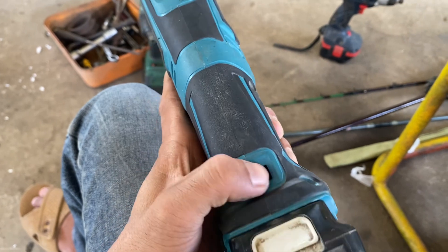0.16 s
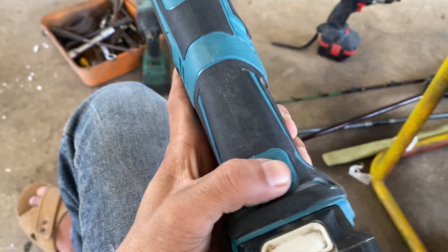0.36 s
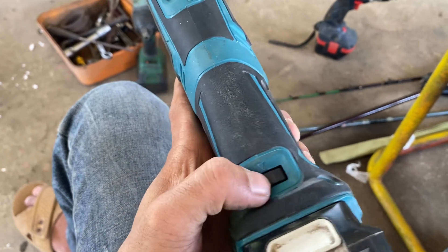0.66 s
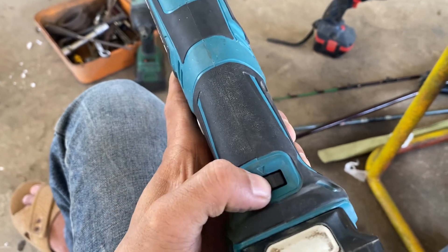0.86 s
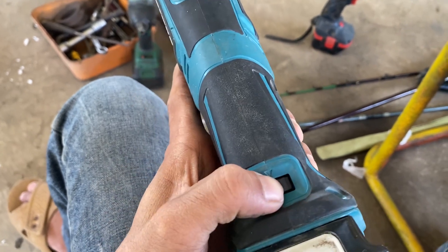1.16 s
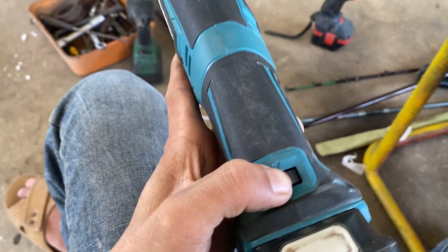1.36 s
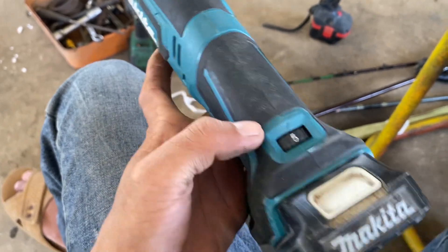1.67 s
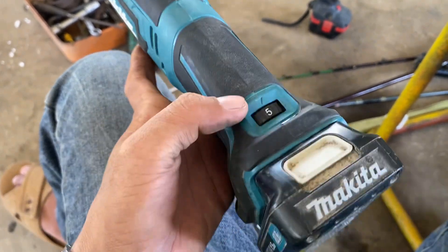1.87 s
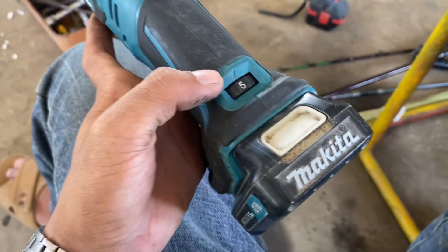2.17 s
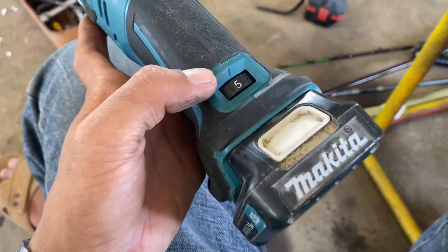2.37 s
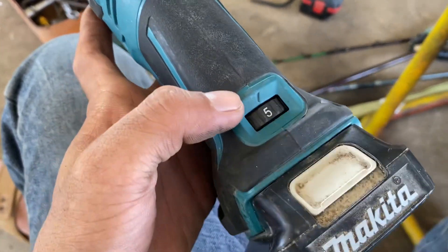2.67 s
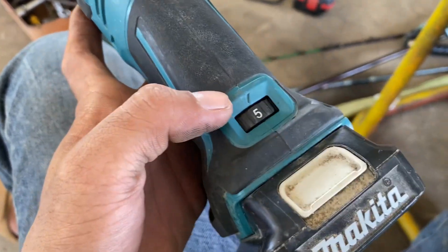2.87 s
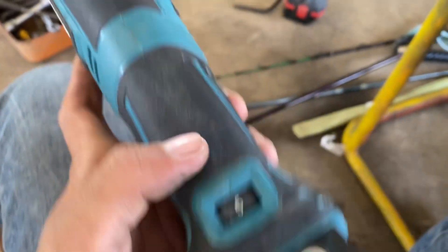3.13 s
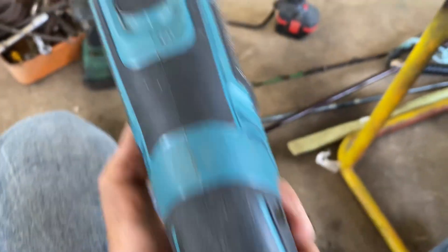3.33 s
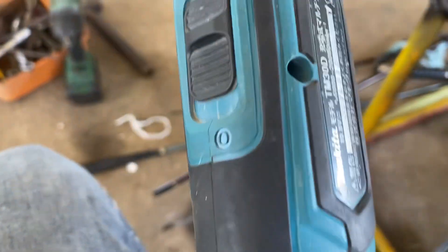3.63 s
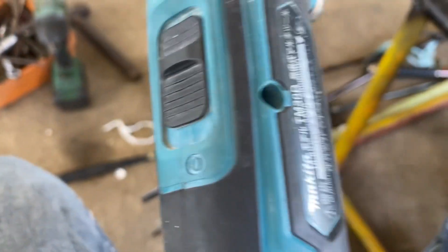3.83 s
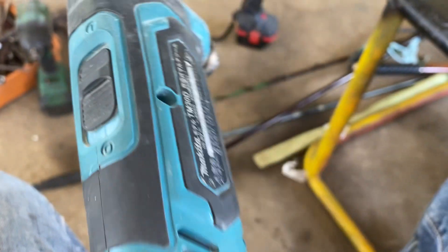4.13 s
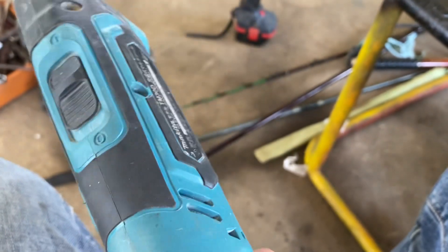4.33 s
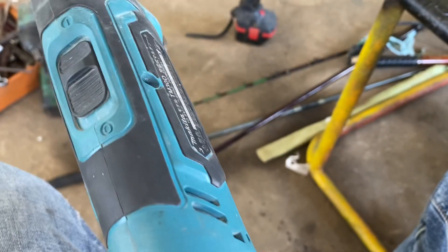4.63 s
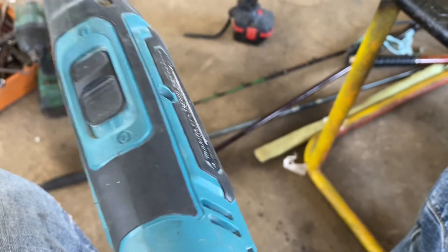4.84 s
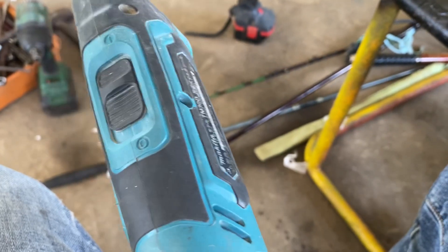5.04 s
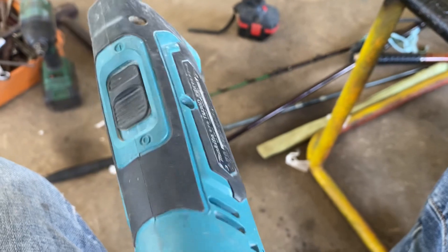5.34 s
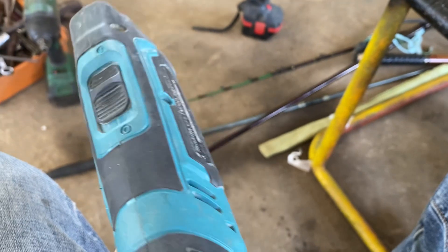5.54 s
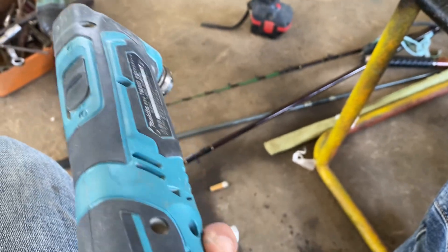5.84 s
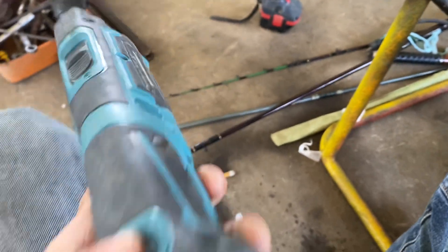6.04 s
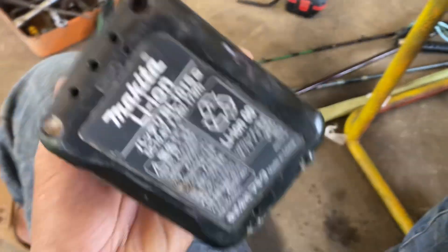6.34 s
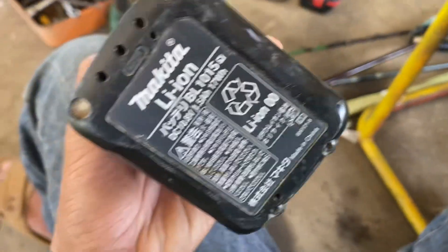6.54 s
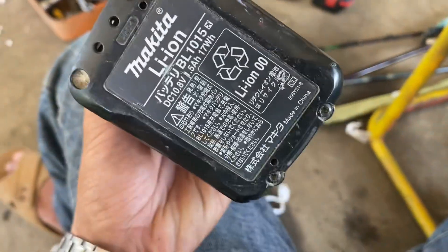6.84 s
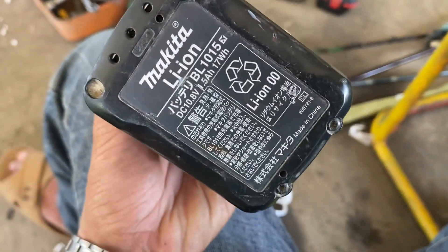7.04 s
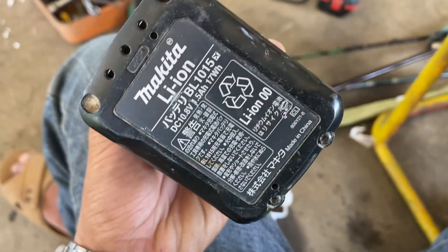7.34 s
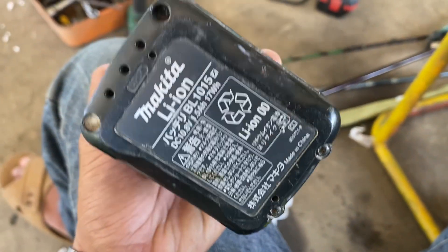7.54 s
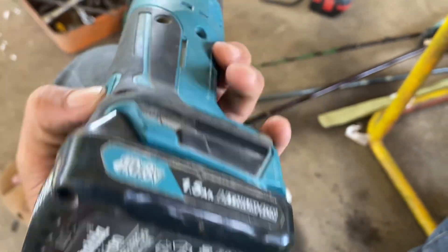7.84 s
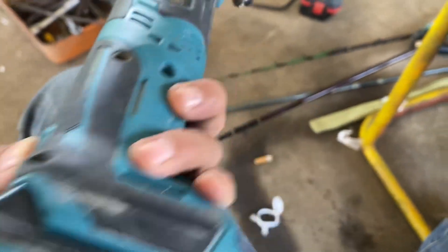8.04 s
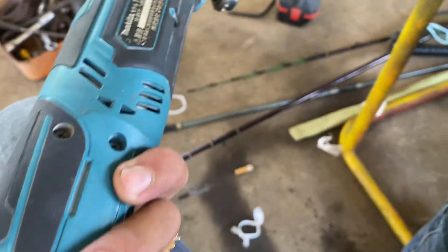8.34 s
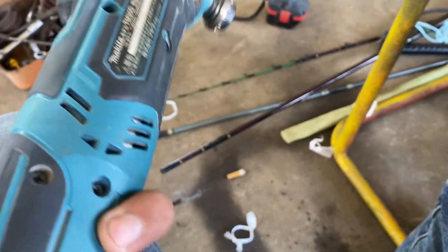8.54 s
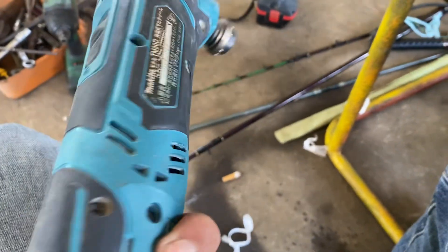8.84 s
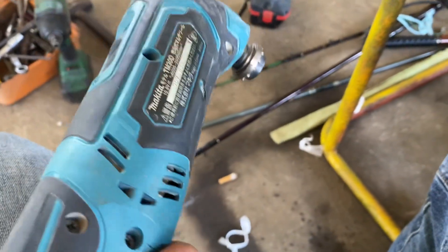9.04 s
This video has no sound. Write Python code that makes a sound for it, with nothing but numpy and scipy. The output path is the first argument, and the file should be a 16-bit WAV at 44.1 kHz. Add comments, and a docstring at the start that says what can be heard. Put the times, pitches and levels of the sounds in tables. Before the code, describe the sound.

Buzzing whine of a cordless oscillating tool rises, holds, winds down to clattering, then speeds up; midway a single-cylinder engine starts thumping.

```python
"""Multi-tool running free in a workshop

A cordless oscillating multi-tool runs in the hand, close to the microphone, over a low rumble from outside.
Its speed dial is turned up, down to a slow rattle and up again. Tones tied to the shaft speed make the whine;
noise shaped by the housing makes the fan's hiss and the drive's knocks, two per turn of the shaft.
Midway a single-cylinder engine nearby catches, idles and picks up: one low pressure swing and ringing per firing.
A few things are bumped: short bands of noise that die away."""
import sys
import numpy as np
from scipy import signal
from scipy.fft import rfft, irfft
from scipy.io import wavfile

SR = 44100
rng = np.random.default_rng(int(sys.argv[2]) if len(sys.argv) > 2 else 0)


def waveform_to_disk(signal):
    """Save audio, clipped to [-1, 1], as 16-bit WAV at the path in sys.argv[1]."""
    frames = np.transpose(np.atleast_2d(signal))
    scaled = np.clip(frames, -1, 1) * 32767
    samples = np.round(scaled).astype(np.int16)
    wavfile.write(sys.argv[1], SR, samples)


N = 405719
TIME = np.arange(N) / SR
FREQ = np.maximum(np.arange(N // 2 + 1) * SR / N, 1)
LEFT_RIGHT = np.array([[1], [-1]])  # opposite signs for the two channels


def undb(db):
    """Turn decibels into a gain."""
    return 10 ** (np.asarray(db) / 20)


def unit(x):
    """Scale a sound to an rms of 1."""
    return x / np.sqrt(np.mean(x ** 2))


def curves(table):
    """Read each column of a timed table, sample by sample."""
    s, *columns = np.transpose(table)
    return [np.interp(TIME, s, column) for column in columns]


def over_hz(table):
    """Spread a (pitch, value) table over all frequencies."""
    hz, value = np.transpose(table)
    return np.interp(np.log(FREQ), np.log(hz), value)


def shape(x, gain):
    """Filter a sound with one gain per frequency."""
    return irfft(rfft(x) * gain, N)


def walk(rate):
    """Drift in straight lines between random points, `rate` points a second, with a spread near 1."""
    points = rng.standard_normal(int(N / SR * rate) + 2)
    return 1.2 * np.interp(TIME * rate, np.arange(len(points)), points)


def window(start, end, edge_s):
    """Give 1 between two times and 0 outside, with sloping edges."""
    return np.clip(np.minimum(TIME - start, end - TIME) / edge_s + .5, 0, 1)


def fade(t, t60):
    """Die away by 60 dB in t60 seconds."""
    return np.exp(-np.log(1000) * t / t60)


def add(out, s, sound):
    """Mix a sound in at time s."""
    start = int(s * SR)
    out[..., start:start + sound.shape[-1]] += sound[..., :N - start]


def burst(hz, t60, spread):
    """Make a dying band of noise around hz in two channels, mostly alike."""
    t = TIME[:SR // 2]
    edges = np.sort(np.clip([hz / spread, hz * spread], 20, .45 * SR))
    band = signal.butter(2, edges, "band", fs=SR, output="sos")
    mid, side = signal.sosfilt(band, rng.standard_normal((2, len(t))))
    return unit(mid + 0.52 * side * LEFT_RIGHT) * fade(t, t60)


# colour of the workshop background: pitch_hz, relative level_db
BACKGROUND_COLOUR = [(25, -30), (45, -1.5), (65, -0.5), (100, 0), (150, 2), (220, -12), (500, -28),
                     (1500, -18), (6000, -47)]


def workshop(level_db=-50, width=0.097):
    """A low rumble from outside is noise with a fixed colour, nearly the same in both channels."""
    mid, side = shape(rng.standard_normal((2, N)), undb(over_hz(BACKGROUND_COLOUR)))
    return unit(mid + width * side * LEFT_RIGHT) * undb(level_db + walk(4.44))


# dull bumps: start_s, level_db, pitch_hz, t60_s (time to die by 60 dB)
BUMPS = [(2.01, -30, 250, 0.16), (2.798, -33, 194, .12), (3.576, -40, 200.3, 0.12),
         (5.553, -35, 328, 0.067), (8.525, -28, 333.2, 0.14)]
# small plastic ticks and a light metal clink: start_s, level_db, pitch_hz, t60_s, band_edge_over_centre (ratio)
TICKS = [(6.358, -29.5, 2330, .04, 1.15), (6.758, -36, 2400, .04, 1.2), (6.885, -43, 6500, .04, 2),
         (6.89, -46, 5500, 0.24, 1.7), (6.893, -46, 5900, 0.48, 1.025), (7.392, -33, 2400, .04, 1.16),
         (7.419, -34, 2400, .04, 1.12), (7.612, -32.5, 2500, 0.045, 1.4)]
# a hollow object knocked twice: start_s, level_db
KNOCKS = [(7.113, -37), (7.163, -33)]
# how that object rings: pitch_hz, level_db on top of the knock's, t60_s, band_edge_over_centre (ratio)
KNOCK_MODES = [(330, 1, .3, 1.36), (552, 1, 0.28, 1.01), (1070, 2, 0.3, 1.29), (1550, -6, 0.41, 1.14),
               (2200, -3, 0.34, 1.09), (6600, -13, .05, 1.15)]


def handling():
    """Bumps, ticks and a hollow double knock are short bands of noise that die away."""
    out = np.zeros((2, N))
    for s, db, hz, t60 in BUMPS:
        add(out, s, undb(db) * burst(hz, t60, spread=1.28))
    for s, db, hz, t60, spread in TICKS:
        add(out, s, undb(db) * burst(hz, t60, spread))
    for s, db in KNOCKS:
        knock = sum(undb(db + mode_db) * burst(hz, t60, spread) for hz, mode_db, t60, spread in KNOCK_MODES)
        add(out, s, knock)
    return out


# the engine's first uneven firings as it catches: start_s, relative level_db
CATCHES = [(5.595, -29), (5.826, -22), (5.907, -22.5), (5.98, -27.5), (6.047, -24.5)]
# then it idles and picks up: time_s, firing_rate_hz
ENGINE_RATE = [(6.217, 11.0), (6.57, 14.26), (6.61, 13.05), (7.1, 12.745), (7.615, 13.37), (7.77, 12.83),
               (8.613, 12.335), (8.835, 18.19), (9.2, 19.3)]


def firings(idle_hz=13, idle_db=-22.5, rise_db_per_s=1.1, rise_db_per_octave=5.5, scatter_db=1.3):
    """List the firings: after the catch one per cycle, growing stronger with time and with speed."""
    rate, = curves(ENGINE_RATE)
    start = ENGINE_RATE[0][0]
    cycles = np.cumsum(rate * (TIME >= start)) / SR
    at = np.flatnonzero(np.diff(np.ceil(cycles)))
    db = idle_db + rise_db_per_s * (TIME[at] - start) + rise_db_per_octave * np.log2(rate[at] / idle_hz)
    return CATCHES + list(zip(TIME[at], db + scatter_db * rng.standard_normal(len(at))))


# exhaust and wall resonances: pitch_hz, relative level_db, t60_s
EXHAUST = [(64.1, -12.5, 0.32), (129.7, -9, 0.44), (151.5, -20.5, 0.6), (187.3, -22.5, 0.58),
           (219, -15, 0.13), (268.1, -13, 0.31), (318.5, -24.5, 0.68), (367, -24, 0.6), (412, -27.5, 0.68)]


def engine(attack_s=0.00085, level_db=-1, swell_s=0.01583, pulse_hz=100, pulse_s=0.02, pulse_db=-7,
           puff_db=-23, puff_hz=240, vary_db=2.5):
    """Each firing is one low pressure swing; exhaust and walls ring on after it, with a dull puff of gas."""
    out = np.zeros((2, N))
    t = TIME[:SR // 2] - swell_s
    pulse = undb(pulse_db) * np.sin(2 * np.pi * pulse_hz * t) * np.exp(-(t / pulse_s) ** 2)
    hz, mode_db, t60 = np.transpose(EXHAUST)[:, :, None]
    # the upper resonances start with the valve's opening, ahead of the low swing
    age = t + np.where(hz > 150, .011, 0)
    swell = np.exp(-(np.minimum(age, 0) * hz / 0.98) ** 2)
    rings = undb(mode_db) * np.sin(2 * np.pi * hz * age) * fade(np.maximum(age, 0), t60) * swell
    attack = np.minimum(TIME[:len(t)] / attack_s, 1)
    for s, db in firings():
        # a harder firing rings the upper resonances more
        bright_db = 0.36 * (db + 13) * np.log2(hz[:, 0] / 130)
        thump = pulse + undb(bright_db + vary_db * rng.standard_normal(len(rings))) @ rings
        puff = undb(puff_db) * burst(puff_hz, t60=1.0, spread=1.41)
        add(out, s, undb(db + level_db) * attack * (thump + puff))
    return out


def yard(x, alike_hz=95, level_db=-14, t60=0.073):
    """The engine's thumps come back off the walls, with opposite sign in the two channels."""
    walls = rng.standard_normal(SR // 2) * fade(TIME[:SR // 2], t60)
    echo = signal.fftconvolve(x.mean(axis=0), walls / np.sqrt(np.sum(walls ** 2)))[:N]
    # without deep bass in the echo, the deepest bass stays the same on both sides
    echo = shape(echo, 1 / (1 + (alike_hz / FREQ) ** 4))
    return x + undb(level_db) * echo * LEFT_RIGHT


def controller(switching_hz=8000, level_db=-62):
    """The speed control chops the motor current: a thin, steady tone, heard when the tool is quiet."""
    return np.sqrt(2) * undb(level_db + walk(8)) * np.sin(2 * np.pi * switching_hz * TIME)


# spells when the loose head clatters, at its slowest: start_s, end_s
CLATTER_SPAN = (6.3, 7.72)
# how the head rings with each knock: pitch_hz, relative level_db, t60_s
HEAD_MODES = [(820, -17.5, 0.039), (1470, -9, 0.03), (2256, -6, 0.032), (2370, -4.5, 0.026),
              (2980, -8.5, 0.016), (3940, -21, .008), (6600, -20, .006)]


def clatter(turns, peak_db=-37, scatter_db=4.0, back_db=-6, late_s=0.0014, detune=0.025, vary_db=4.5,
            swell_db=0.5):
    """The loose fork knocks at both ends of its swing; force, timing and ring differ each time."""
    out = np.zeros(N)
    t = TIME[:SR // 20]
    hz, mode_db, t60 = np.transpose(HEAD_MODES)[:, :, None]
    strength = window(*CLATTER_SPAN, 0.1) * undb(swell_db * walk(9))
    ends = np.flatnonzero(np.diff(np.floor(2 * turns)) * strength[1:])
    for k, at in enumerate(ends):
        force, late = rng.standard_normal(2)
        pitch, colour = rng.standard_normal((2, len(hz), 1))
        wave = np.sin(2 * np.pi * hz * (1 + detune * pitch) * t)
        ring = undb(mode_db + vary_db * colour) * wave * fade(t, t60)
        # every second knock, on the way back, is weaker
        knock_db = peak_db + scatter_db * min(force, 1) + back_db * (k % 2)
        add(out, TIME[at] + late_s * late, strength[at] * undb(knock_db) * ring.sum(axis=0))
    return out


# housing parts that buzz at certain speeds and grips: start_s, end_s, start_hz, end_hz, width_hz, relative level_db
BUZZES = [(0.35, 1.75, 1090, 1102, 440, -40.5), (0.2, 1.6, 2302, 2295, 600, -41),
          (0.401, 1.603, 3150, 3180, 900, -41), (3.191, 3.41, 2800, 2430, 330, -26.5),
          (3.097, 3.924, 950, 926, 220, -37.5), (3.42, 3.98, 4250, 4270, 900, -30.5),
          (4.196, 4.684, 2540, 2450, 260, -35), (4.196, 4.75, 3970, 3980, 380, -39),
          (4.75, 5.25, 3970, 3945, 380, -36.5), (5.294, 6.028, 3860, 3880, 380, -43.5),
          (5.353, 6.005, 2370, 2364, 352, -44), (5.917, 6.03, 2797, 2800, 2400, -37),
          (6.55, 7.7, 7300, 7400, 60, -67), (7.686, 8.248, 3800, 3960, 450, -44),
          (7.8, 8.5, 4600, 4730, 500, -48.5), (7.95, 8.201, 2500, 2903, 2400, -36.5),
          (8.396, 9.246, 4040, 3950, 400, -38.5), (8.858, 9.25, 6050, 6170, 300, -43)]


def buzzes(turns, edge_s=0.14, sharpness=1.45, flicker_db=1.5):
    """Narrow resonances are shaken unevenly once a turn; each fades in and out and slides as the grip shifts."""
    jolts = np.exp(sharpness * np.cos(2 * np.pi * turns)) * undb(flicker_db * walk(70))
    out = 0
    for start, end, start_hz, end_hz, width, db in BUZZES:
        # slow noise, moved up to the sliding pitch, is a narrow band around it
        pole = np.exp(-np.pi * width / SR)
        a, b = signal.lfilter([1], [1, -2 * pole, pole ** 2], jolts * rng.standard_normal((2, N)))
        angle = 2 * np.pi * np.cumsum(np.interp(TIME, [start, end], [start_hz, end_hz])) / SR
        band = unit(a * np.cos(angle) + b * np.sin(angle))
        out = out + undb(db) * band * window(start, end, edge_s)
    return out


# tones of the ball bearing: multiple_of_shaft_speed, level_db against the rattle, slip_turns
BEARING = [(3.29, -5, 0.18), (3.7, -10.5, 0.12)]


def bearing(turns, rattle_db):
    """The balls slip as they roll, so their tones are broad and lie between the shaft's own."""
    return sum(undb(rattle_db + db) * np.sin(2 * np.pi * (ratio * turns + slip * walk(70)))
               for ratio, db, slip in BEARING)


# colour of the housing: pitch_hz, relative level_db
HOUSING = [(120, -24.5), (300, -16.5), (400, -10.5), (520, -5), (680, -8.5), (800, -6.5), (950, -2),
           (1150, -6), (1420, -4), (1750, -3), (2050, -0.5), (2370, 2), (2650, -0.9), (3000, -1),
           (3500, -3.5), (3950, -3.5), (4550, -10.5), (6100, -14.5), (7500, -13.5)]
# colour of the air at the vents: pitch_hz, relative level_db
VENTS = [(8300, -4), (9600, 7), (11000, -3), (12200, -5.5), (12800, -14), (14000, -10.5), (15700, -34)]
# where one sounding part hands over to the next: pitch_hz
PART_EDGES_HZ = (1600, 2800, 4500, 8000)


def rattle(turns, part_db, scatter_db=3.0, back_db=-2, knock_share=0.56, gate=0.3):
    """The fork knocks at both ends of its swing and rubs in between; housing and vents colour it."""
    ends = np.flatnonzero(np.diff(np.floor(2 * turns)))
    chance = rng.standard_normal((len(ends), 2))
    knocks = np.zeros(N)
    late = (0.00018 * SR * chance[:, 1]).astype(int)
    knock_db = scatter_db * chance[:, 0] + back_db * (np.arange(len(ends)) % 2)
    knocks[np.clip(ends + late, 0, N - 1)] = undb(knock_db)
    # each knock is a short chatter of contacts
    chatter = signal.lfilter([1], [1, -np.exp(-1 / (0.00055 * SR))], knocks) * rng.standard_normal(N)
    rub = (1 + gate * np.cos(2 * np.pi * turns)) * rng.standard_normal(N)
    drive = rfft(knock_share * unit(chatter) + unit(rub)) * undb(over_hz(HOUSING + VENTS))
    # split into bands, one per part, each with its own level
    below = [0] + [1 / (1 + (FREQ / hz) ** 20) for hz in PART_EDGES_HZ] + [1]
    out = 0
    for k, db in enumerate(part_db):
        part = unit(irfft(drive * (below[k + 1] - below[k]), N))
        out = out + part * undb(db + 1.1 * walk(40))
    return out


# spells when the fork skips on every second turn, at middling speeds: start_s, end_s, relative level_db
SKIPS = [(-0.1, 0.27, -47), (5.276, 5.6, -46), (8.9, 9.3, -54)]
# the tones that then appear: multiple_of_half_shaft_speed, relative level_db
SKIP_ORDERS = [(5, -9.5), (7, -14), (11, -6), (13, -1), (21, -2), (25, -1.5), (27, -10), (29, -1), (35, -2),
               (39, -11), (41, -11), (43, -1), (47, -7)]


def skipping(turns, slip=0.0076, flutter_db=4.0):
    """The fork strikes hard only every second turn: odd multiples of half the shaft speed sound."""
    angle = np.pi * (turns + slip * walk(60))
    gain = sum(undb(db) * window(start, end, 0.071) for start, end, db in SKIPS)
    tones = sum(undb(db + flutter_db * walk(30)) * np.sin(round(k) * angle + rng.uniform(0, 2 * np.pi))
                for k, db in SKIP_ORDERS)
    return gain * tones * np.sqrt(2)


# An order is a tone at a whole multiple of the shaft speed.
# All the tables of orders below: multiple_of_shaft_speed, relative level_db
# before the dial is turned up
START_ORDERS = [(1, -17), (2, -9), (3, -12), (4, -25), (5, -8), (6, -5), (9, -9), (10, -8), (11, -8),
                (12, -9), (18, -14), (24, -10), (25, -12)]
# as the tool is turned to show its dial, flank, shoulder, switch and head
DIAL_ORDERS = [(1, -9.5), (2, -5), (3, -31), (4, -3.5), (5, -5.5), (6, -14.5), (9, -15), (10, -15),
               (11, -11), (12, -8), (13, -19), (15, -13.5), (17, -11.5), (18, -12.5), (19, -15), (24, -13),
               (25, -9)]
FLANK_ORDERS = [(1, -9.5), (2, -0.5), (3, -17), (4, -0.5), (5, -2), (9, -16), (10, -23), (11, -7.5),
                (12, -5), (14, -18), (17, -5.5), (18, -13), (19, -12), (21, -12), (24, -10), (25, -5)]
SHOULDER_ORDERS = [(1, -9.5), (2, -1.5), (3, -15), (4, -4), (5, -7), (6, -11), (9, -17), (10, -8),
                   (11, -4.5), (13, -19), (15, -17), (16, -8.5), (17, -26), (18, -9), (19, -13), (20, -8),
                   (21, -10), (22, -11), (24, -17), (25, -7)]
SWITCH_ORDERS = [(1, -3), (2, -1.5), (3, -10.5), (4, -6), (5, -5.5), (6, -7), (9, -3), (10, -4), (11, -28),
                 (12, -1.5), (13, -5), (14, -3), (15, -3), (16, -8), (17, -0.5), (18, -5), (19, -18),
                 (21, -8), (24, -8.5)]
HEAD_ORDERS = [(1, -17), (2, -5.5), (3, -17), (4, -9), (5, -13), (6, -5), (9, -1), (10, -2), (11, -18),
               (12, -5), (14, -11), (16, -12), (17, -5), (18, -8), (20, -11), (22, -16), (24, -11),
               (25, -9)]
# as the motor begins to slow, lower down, and as it climbs again
COAST_ORDERS = [(1, -11), (2, -14.5), (3, -4.5), (4, -14.5), (5, -10), (6, -2.5), (9, -16), (10, -1),
                (11, -3.5), (12, -3.5), (13, -15), (14, -15), (15, -8), (16, -6), (17, -12), (18, -11),
                (19, -15), (20, -11), (21, -10), (23, -14), (26, -13)]
SLOW_ORDERS = [(1, -7), (2, -9.5), (3, -6), (4, -11), (5, -3), (6, -7), (9, -11), (10, 1.5), (11, -1),
               (12, -8), (13, 0), (14, -8), (15, -8), (17, -1.5), (18, -5), (19, -11), (20, -10), (21, -13),
               (22, -11), (23, -11)]
CLIMB_ORDERS = [(2, -10), (3, -9), (4, -9.5), (5, -7), (6, -16), (10, -3), (11, -10), (12, -2), (13, -10),
                (14, -3), (16, -6), (20, -2), (21, -5), (22, -2)]
# what the microphone hears of the tool over time: time_s, reference level_db, table of orders
VIEWS = [(0.22, -39, START_ORDERS), (0.34, -40.5, DIAL_ORDERS), (0.44, -35, DIAL_ORDERS),
         (0.8, -35, DIAL_ORDERS), (1.45, -33.5, DIAL_ORDERS), (1.7, -38, FLANK_ORDERS),
         (2.45, -38, FLANK_ORDERS), (2.65, -36, SHOULDER_ORDERS), (3.15, -35, SHOULDER_ORDERS),
         (3.48, -34.5, SWITCH_ORDERS), (3.9, -34, SWITCH_ORDERS), (4.15, -37.5, SWITCH_ORDERS),
         (4.32, -35, HEAD_ORDERS), (4.68, -36.5, HEAD_ORDERS), (4.8, -34, COAST_ORDERS),
         (4.93, -34, COAST_ORDERS), (5.05, -36, SLOW_ORDERS), (5.27, -40.5, SLOW_ORDERS),
         (5.6, -44.5, SLOW_ORDERS), (6.4, -51, SLOW_ORDERS), (7.5, -37.5, SLOW_ORDERS),
         (8.4, -49, CLIMB_ORDERS), (9.0, -37.5, CLIMB_ORDERS)]
# orders that stay strong: multiple_of_shaft_speed
STRONG_ORDERS = (1, 2, 4)
# two orders at the core of the whine: multiple_of_shaft_speed
CORE_ORDERS = (7, 8)
# how these two swell and fade against each other: time_s, seventh level_db, eighth level_db
CORE = [(0, -46, -59), (0.3, -48, -48), (0.44, -40, -32.5), (0.6, -41, -45), (0.8, -38, -34.5),
        (1.0, -41, -37), (1.25, -42, -31.5), (1.5, -39, -35), (1.62, -43, -36), (1.75, -33, -35.5),
        (2.02, -42, -36.5), (2.24, -36, -29), (2.42, -42, -38), (2.68, -34, -27.5), (3.1, -36, -30),
        (3.28, -47, -33), (3.48, -33.5, -34.5), (3.75, -30, -37), (4.1, -36, -33), (4.3, -44, -28),
        (4.45, -51, -35.5), (4.85, -42, -41), (5.15, -41.5, -41.5), (5.7, -60, -49), (8.7, -59, -57),
        (8.95, -62, -50), (9.1, -51, -37)]
# housing resonances that ring when an order sweeps through: pitch_hz, half_width_hz, gain_db
RINGS = [(982, 88, 11)]


def whine(turns, speed, chatter, flutter_db=1.0, wander_db=1.77, weak_flutter_db=1.47, strong_wander_db=1.0,
          clear_hz=140, radiate_hz=200, weak_clear_hz=175, slot_clear_hz=110, slot_order=5, chatter_db=-2):
    """Shaft orders flutter with the play in the drive and sink at low speed, the armature's slot tone last."""
    angle = 2 * np.pi * (turns + 0.006 * walk(60))
    sides = [{round(k): db for k, db in orders} for _, _, orders in VIEWS]
    levels = {}
    for k in sorted(set().union(*sides)):
        # an order missing from a side is faint there
        points = [(s, top_db + side.get(k, -22)) for (s, top_db, _), side in zip(VIEWS, sides)]
        levels[k] = curves(points)[0]
    levels.update(zip(CORE_ORDERS, curves(CORE)))
    clear = 1 / (1 + (clear_hz / speed) ** 5)
    weak_clear = clear / (1 + (weak_clear_hz / speed) ** 10)
    out = 0
    for k, db in levels.items():
        db = db + sum(ring_db / (1 + ((k * speed - hz) / width) ** 2) for hz, width, ring_db in RINGS)
        # the upper orders weaken while the drive chatters
        db = db + chatter_db * chatter * (k > slot_order)
        if k == slot_order:
            gain = undb(db + flutter_db * walk(60)) / (1 + (slot_clear_hz / speed) ** 3)
        elif k in STRONG_ORDERS + CORE_ORDERS:
            gain = undb(db + strong_wander_db * walk(12) + flutter_db * walk(60)) * clear
        else:
            gain = undb(db + wander_db * walk(6) + weak_flutter_db * walk(70)) * weak_clear
        tone = np.sin(k * angle + rng.uniform(0, 2 * np.pi))
        # so small a body radiates little bass
        out = out + gain * tone / (1 + (radiate_hz / (k * speed)) ** 6)
    return np.sqrt(2) * out


# the tool at the two microphone ports, level: pitch_hz, left_minus_right_db
PORT_BALANCE = [(250, 2), (380, -1.5), (620, 7.5), (1000, 6.5), (2300, 4), (4400, 2.5), (6300, 5.5),
                (7300, 0.5), (8400, -0.5)]
# phase: pitch_hz, left_lead_radians
PORT_PHASE = [(100, 0), (500, 1), (850, 0), (1200, 1), (1650, -1.7), (2500, 0), (3000, .5), (5000, .6),
              (6700, 0), (8400, -3.1), (9700, -6.2), (10900, -6.6), (11300, -9.3), (12900, -9.5),
              (13150, -12.5), (14800, -12.6), (15400, -15.7)]
# how alike the ports are before the room's share is set: pitch_hz, coherence (0-1)
PORT_LIKENESS = [(200, 0.69), (700, 0.35), (1050, 0.49), (1400, 0.038), (2000, 0.97), (2600, 0.09),
                 (3500, 0.44), (8000, 1), (9900, 1)]


def at_ports(x, room_share, room_t60=0.25, level_db=1):
    """Direct sound differs in level and phase between the ports; the walls add an unrelated part."""
    wet = np.clip(room_share * (1 - np.sqrt(np.clip(over_hz(PORT_LIKENESS), 0, 1))), 0, 1)
    walls = rng.standard_normal((2, SR // 2)) * fade(TIME[:SR // 2], room_t60)
    walls = rfft(walls / np.sqrt(np.sum(walls ** 2, axis=1, keepdims=True)), N)
    gain = undb(LEFT_RIGHT * over_hz(PORT_BALANCE) / 2)
    direct = np.exp(1j * LEFT_RIGHT * over_hz(PORT_PHASE) / 2)
    mix = direct * np.sqrt(1 - wet) + walls * np.sqrt(wet)
    return undb(level_db) * shape(x, gain / gain.mean(axis=0) * mix)


# the motor follows the speed dial: time_s, shaft_speed_hz before a slight wobble
SPEED = [(0, 213), (0.15, 217), (0.22, 228), (0.4, 286), (0.5, 300), (1.2, 299), (2.1, 290), (2.5, 288.7),
         (2.92, 292.3), (3.4, 286), (4.2, 284.8), (4.4, 273.5), (4.7, 263.5), (4.9, 243.3), (5.1, 218.1),
         (5.3, 190.5), (5.55, 150.5), (5.9, 106), (6.3, 77.3), (6.85, 69), (7.4, 82), (7.9, 93), (8.7, 143),
         (8.95, 176), (9.05, 186), (9.2, 193)]
# mechanical noise, shaded while the battery faces the microphone: time_s, relative rattle_db, relative hiss_db
NOISE = [(0.0, -40.5, -40), (0.27, -32.5, -38.5), (0.43, -34, -36), (0.64, -35, -37), (1.2, -32, -35.5),
         (3.1, -32.5, -34), (3.4, -29, -32.5), (3.85, -29.5, -30), (4.3, -31, -33.5), (4.7, -32, -34),
         (5.2, -38.5, -37.5), (5.98, -35, -42), (6.18, -43.5, -55.5), (6.8, -48, -62.5), (7.55, -43, -54.5),
         (8.03, -37.5, -45.5), (8.22, -38.5, -45), (8.53, -34, -37.5), (9.2, -30.5, -32.5)]
# the parts that sound, from low to high (shell, drive head, gear, fan, vents):
# relative level_db, share_following_hiss (ratio)
PARTS = [(-5, -0.19), (-2.47, 0.22), (-4.5, 0.2), (-0.7, 0.82), (-1.6, 1.19)]
# fits in which the drive chatters in its play: start_s, end_s, strength (0-1)
CHATTERS = [(0.5, 0.648, 0.65), (2.34, 2.575, 0.35), (3.58, 3.634, 0.9), (3.798, 3.896, 1)]


def multi_tool(chatter_edge_s=0.03, chatter_db=3.5):
    """Whine, bearing, rattle, buzzes and clatter follow the one shaft; the speed control sings faintly."""
    speed = curves(SPEED)[0] * (1 + 0.0008 * walk(7))
    turns = np.cumsum(speed) / SR
    chatter = sum(strength * window(start, end, chatter_edge_s) for start, end, strength in CHATTERS)
    rattle_db, hiss_db = curves(NOISE)
    rattle_db = rattle_db + chatter_db * chatter
    part_db = [db + rattle_db + share * (hiss_db - rattle_db) for db, share in PARTS]
    # the bearing's tones come out only at high speed
    fast = 1 / (1 + (245 / speed) ** 16)
    noise = fast * bearing(turns, rattle_db) + rattle(turns, part_db) + buzzes(turns) + clatter(turns)
    tones = whine(turns, speed, chatter) + skipping(turns) + controller()
    return at_ports(tones, room_share=0.24) + at_ports(noise, room_share=0.97)


def scene():
    """Put the tool in front, the engine and the room behind."""
    return workshop() + handling() + yard(engine()) + multi_tool()


def record(dry, bass_hz=45, top_hz=15700):
    """The microphone drops the deepest bass and cuts the top steeply."""
    sound = shape(dry, 1 / np.sqrt(1 + (bass_hz / FREQ) ** 10))
    return signal.sosfilt(signal.ellip(10, .2, 80, top_hz, fs=SR, output="sos"), sound)


dry = scene()
out = record(dry)
waveform_to_disk(out)
```